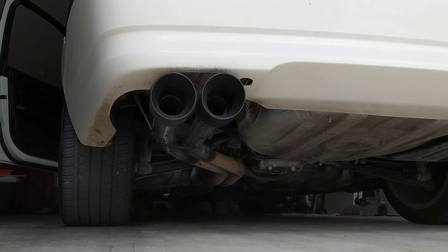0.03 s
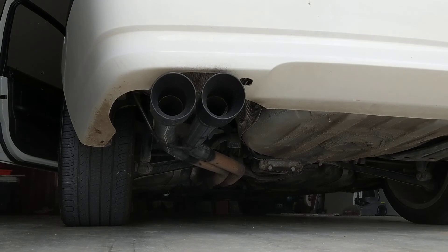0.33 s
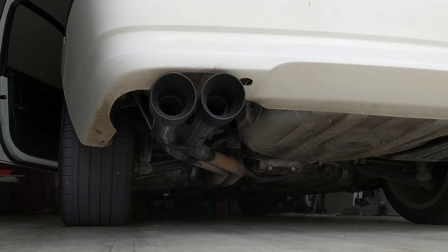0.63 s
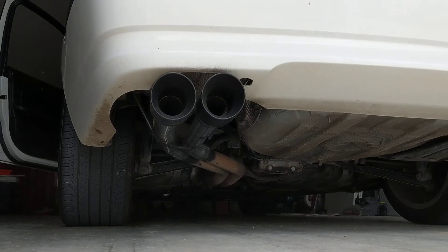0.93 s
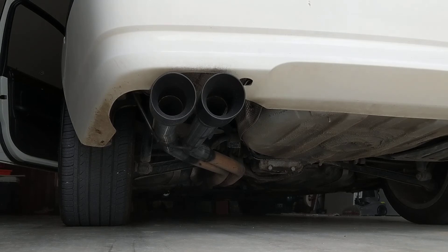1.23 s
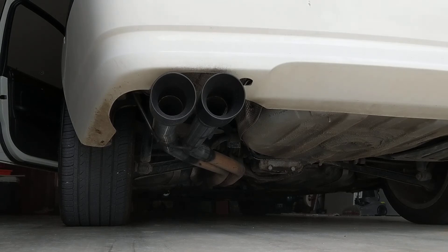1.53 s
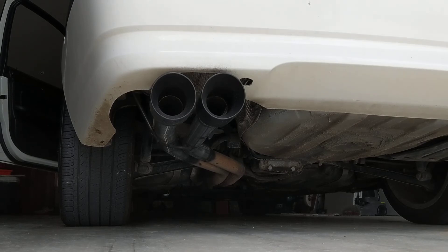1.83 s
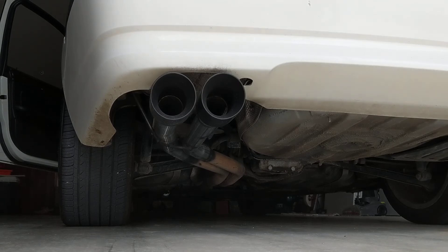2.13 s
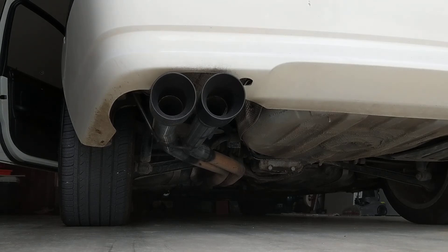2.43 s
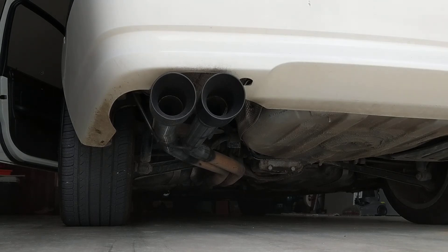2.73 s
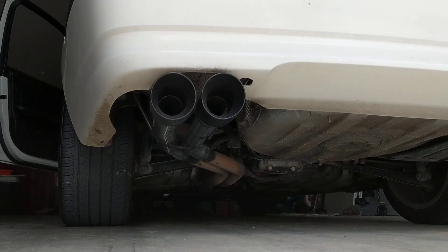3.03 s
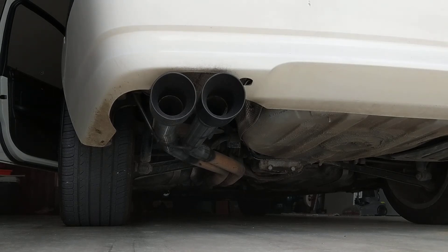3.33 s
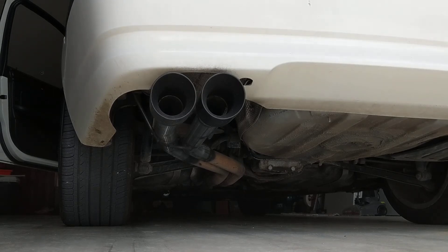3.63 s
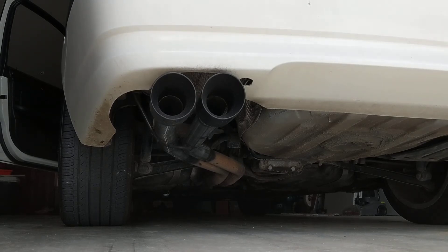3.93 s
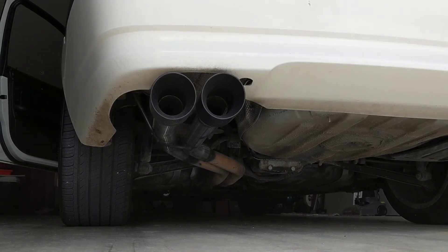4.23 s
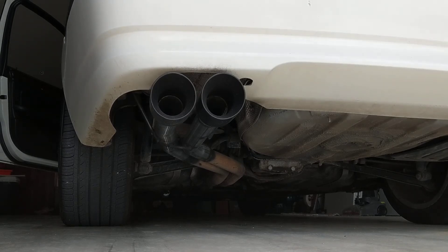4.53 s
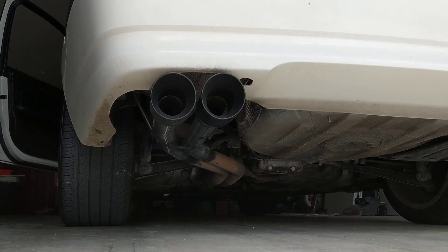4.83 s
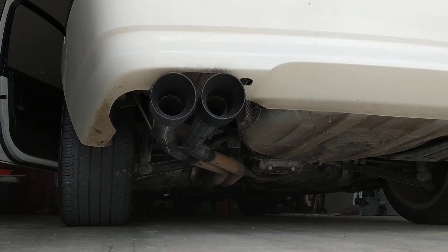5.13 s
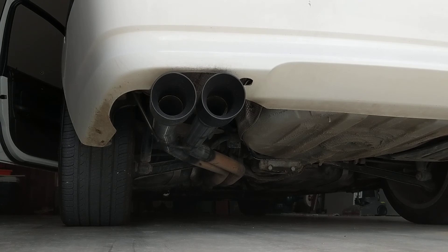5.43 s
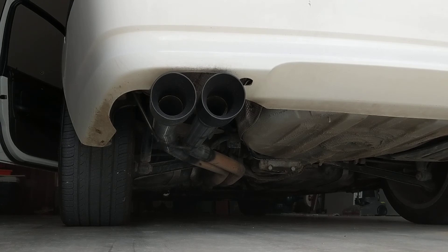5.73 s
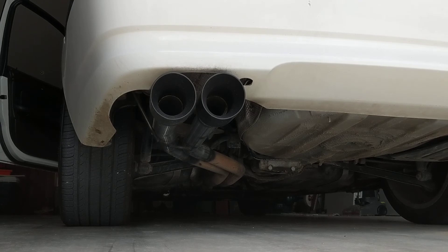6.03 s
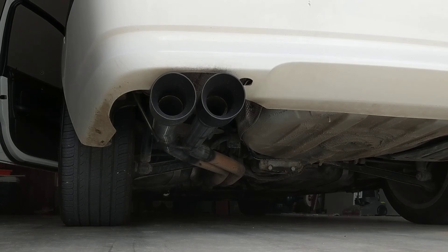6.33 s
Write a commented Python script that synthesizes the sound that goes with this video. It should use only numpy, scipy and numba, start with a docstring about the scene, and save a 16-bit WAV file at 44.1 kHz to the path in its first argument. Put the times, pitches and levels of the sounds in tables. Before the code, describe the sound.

A car engine is revved, sinks to a low idle, then climbs in three throaty blips, heard close to the exhaust.

```python
"""A six-cylinder car, parked on concrete, is revved, sinks towards idle and is blipped three more times.
Blowdown pulses from two banks ring the exhaust pipe; on throttle the tailpipes boom and rush with gas,
and on overrun the silencer burbles and drones. The microphone is so close that it overloads into a rasp,
and an automatic gain control leans on the peaks. Volleys of sharp clicks keep step with the firings."""
import sys
import numpy as np
from scipy import signal
from scipy.fft import rfft, irfft
from scipy.io import wavfile
from scipy.ndimage import uniform_filter1d
from numba import njit

SR = 44100
rng = np.random.default_rng(int(sys.argv[2]) if len(sys.argv) > 2 else 0)


def inscribe(sig):
    """Save sig as 16-bit PCM at rate SR to the path in sys.argv[1].

    A 1-D sig is mono; a 2-D sig holds one channel per row.
    Samples are clipped to [-1, 1] before scaling.
    """
    pcm = np.round(np.clip(np.atleast_2d(sig).T, -1, 1) * 32767)
    wavfile.write(sys.argv[1], SR, pcm.astype(np.int16))


N = 285768
TIME = np.arange(N) / SR

# colour of the turbulent jet at the tailpipes, shared by the clicks: frequency_hz, relative_db
JET_SPECTRUM = [(30, -25), (100, -8.5), (250, -6.5), (600, 2.5), (1100, 0), (2200, -7.5), (4000, -17.5),
                (8000, -32.5), (15000, -52)]


def undb(db):
    """Decibels to gain."""
    return 10 ** (np.asarray(db) / 20)


def curves(table, at):
    """A table's later columns, interpolated at these values of its first."""
    points, *columns = np.transpose(table)
    return [np.interp(at, points, column) for column in columns]


def smooth(x, seconds):
    """Triangular running mean."""
    size = max(int(seconds * SR), 1)
    return uniform_filter1d(uniform_filter1d(x, size), size)


def steady(x):
    """Holds the running rms at 1, leaving the single beats as they are."""
    return x / np.sqrt(smooth(x ** 2, seconds=.06) + 1e-12)


def noise(spectrum):
    """Noise of rms 1, coloured by (frequency_hz, relative_db) points."""
    hz, db = np.transpose(spectrum)
    bins_hz = np.maximum(np.arange(N // 2 + 1) * SR / N, 1)
    colour = undb(np.interp(np.log(bins_hz), np.log(hz), db))
    x = irfft(rfft(rng.standard_normal(N)) * colour, N)
    return x / x.std()


def resonate(x, hz, width_hz):
    """One resonance with gain 1 at its centre."""
    return signal.lfilter(*signal.iirpeak(hz, hz / width_hz, fs=SR), x)


def rolloff(x, hz, kind="low", order=2):
    """Smooth low-pass or high-pass."""
    return signal.sosfilt(signal.butter(order, hz, kind, fs=SR, output="sos"), x)


def partial(cycles, lag=.2):
    """A sine of rms 1 that follows a cycle count, late by a share of a cycle."""
    return np.sqrt(2) * np.sin(2 * np.pi * (cycles - lag))


def notch(x, cycles):
    """Takes out the partial that follows this cycle count."""
    carrier = np.exp(2j * np.pi * cycles)
    return x - 2 * (smooth(x / carrier, seconds=.05) * carrier).real


def throttle():
    """Engine load: each push opens the throttle steadily and holds it, then the load dies away."""
    # pushes on the accelerator: start_s, length_s, depth (about 0-1), rise_s, release_s
    pushes = [(-0.05, 0.22, 0.49, 0.037, 0.15), (0.113, 0.12, 0.97, 0.057, 0.16),
              (3.028, 0.36, 0.9, 0.34, 0.22), (3.483, 0.16, 1.09, 0.045, 0.16),
              (4.018, 0.23, 0.77, 0.042, 0.12), (4.525, 0.073, 0.61, 0.046, 0.056),
              (5.346, 0.1, 0.74, 0.068, 0.33), (5.51, 0.33, 0.89, 0.22, 0.2),
              (6.412, 0.077, 0.49, 0.041, 0.27)]
    load = np.zeros(N)
    for start_s, length_s, depth, rise_s, release_s in pushes:
        opening = np.clip((TIME - start_s) / rise_s, 0, 1)
        closing = np.exp(-np.maximum(TIME - start_s - length_s, 0) / release_s)
        load = np.maximum(load, depth * opening * closing)
    return load


def blowdown(firings, decay_share, scatter_db):
    """Each exhaust valve opens quickly and its pressure dies within a share of the firing interval."""
    index, phase = firings.astype(int), firings % 1
    strength = undb(scatter_db * rng.standard_normal(N // 100))
    return strength[index] * phase / decay_share * np.exp(-phase / decay_share)


def boom(firings, firing_hz, load, push_db):
    """The gas column pumps once per firing, swelling as it crosses the pipe's standing waves."""
    # boom with the throttle shut: firing_hz, level_db
    boom_levels = [(48, -41), (62, -34), (76, -18.5), (100, -20.5), (123, -6.5), (143, -17), (162, -7.5),
                   (177, -4.5), (205, -8), (240, -8), (320, -10.5)]
    shut_db, = curves(boom_levels, firing_hz)
    # under load the wave steepens and barks at the octave, which the silencer swallows at high speed
    bark_gain = undb(-6.5) * np.sqrt(load) * np.interp(firing_hz, [162, 185], [1, 0])
    bark = bark_gain * partial(2 * firings, lag=0.795)
    return undb(shut_db + push_db * load) * (partial(firings) + bark)


def lope(firings, firing_hz, load, push_db):
    """One bank pushes harder than the other: a throb at half the firing rate."""
    # lope with the throttle shut: firing_hz, level_db
    lope_levels = [(70, -64), (110, -40), (138, -13.5), (165, -16), (195, -34), (228, -8.5), (242, -20),
                   (275, -5), (320, -26.5)]
    shut_db, = curves(lope_levels, firing_hz)
    return undb(shut_db + push_db * load) * partial(firings / 2)


def burble(firings, ragged, hz, width_hz):
    """Ragged burns churn in the silencer: a hollow, fluttering roar."""
    churn = rng.standard_normal(N) * (blowdown(firings, decay_share=0.28, scatter_db=0.5) + 0.029)
    hollow = resonate(resonate(churn, hz, width_hz), hz, width_hz)
    return ragged ** 1.02 * steady(hollow)


def growl(firings, ragged):
    """Pulses of two unequal banks ring the pipe; their limp adds half orders between the harmonics."""
    # strength of each cylinder in firing order: relative_db
    cylinder_db = [-0.18, -0.9, -0.051, 0.84, 0.25, 0.095]
    # standing waves of pipe and silencer: pitch_hz, width_hz, relative_db
    pipe_modes = [(74.5, 3.3, -1), (125.1, 9.2, 6), (178.6, 14.8, 11.5), (250, 54, -1.5), (297, 59, 5),
                  (404, 40, 4.5), (484.4, 16.5, 3.5), (593.3, 16.5, 3), (790, 390, -3), (1065, 290, -26)]
    late_share = 0.048  # of a firing interval: the second bank's pulses come late
    path_lag_s, path_db = 0.00056, -3.5  # its path is also longer and lossier
    index = firings.astype(int)
    bank = index % 2
    # ragged burns stray in timing and strength, and are more abrupt
    timing_jitter, strength_jitter = rng.standard_normal((N // 100, 2))[index].T
    centre = .5 + late_share * (bank - .5) + 0.051 * ragged * timing_jitter
    strength = undb(np.take(cylinder_db, index, mode="wrap") + 1.26 * ragged * strength_jitter)
    spread = 0.078 * (1 - 0.67 * ragged)
    pulses = strength * np.exp(-.5 * ((firings % 1 - centre) / spread) ** 2)
    second_bank = undb(path_db) * np.interp(TIME - path_lag_s, TIME, pulses * bank)
    flow = pulses * (1 - bank) + second_bank
    flow *= 1 + 0.078 * rng.standard_normal(N)  # never quite smooth
    pipe = sum(undb(db) * resonate(flow, hz, width_hz) for hz, width_hz, db in pipe_modes)
    pipe = rolloff(pipe, hz=1490)  # the silencer's packing soaks up the treble
    pipe = rolloff(pipe, hz=75, kind="high", order=4)  # small outlets radiate almost no sub-bass
    return steady(notch(notch(pipe, firings), firings / 2))  # boom and lope carry these two orders


def gas(firings, level_db):
    """The jet rushes in uneven puffs, one per firing; a slow jet is dull, a fast one bright."""
    puffs = steady(blowdown(firings, decay_share=0.19, scatter_db=-1.0))
    jet = steady(noise(JET_SPECTRUM) * (puffs + 0.53))
    dull = rolloff(jet, hz=2000)
    brightness = np.interp(level_db, [-32, -10], [0, 1])
    return undb(level_db) * (dull + brightness * (jet - dull))


def hiss(firing_hz, load, push_db):
    """A smooth hiss, faint near idle, that grows with speed and as soon as the throttle cracks open."""
    # colour of the hiss: frequency_hz, relative_db
    hiss_spectrum = [(40, -27), (200, 15), (700, 8), (1500, -4.5), (2700, -6), (3300, -11.5), (5000, -11.5),
                     (6500, -9.5), (7700, -12), (8400, -23), (12000, -28), (15500, -37)]
    shut_db = np.interp(firing_hz, [68, 130, 300], [-33.5, -22, -15])
    return undb(shut_db + push_db * np.sqrt(load)) * noise(hiss_spectrum)


def drone(firings, firing_hz, centre_hz, width_hz, scatter_db):
    """Low orders swell as they slide through the silencer's hollow resonance; uneven burns shake them."""
    # orders the silencer sings with on overrun: multiple of the firing rate, relative_db
    orders = [(2, 1), (2.5, 1.5), (3, -8)]
    tone = np.zeros(N)
    for order, db in orders:
        detuning = 2 * (order * firing_hz - centre_hz) / width_hz
        tone += undb(db) * partial(order * firings, lag=0.86) / (1 + detuning ** 2)
    burns = undb(scatter_db * rng.standard_normal(N // 100))[firings.astype(int)]
    return tone * smooth(burns, seconds=0.0026)


def clicks(firings, decay_s, gain_db):
    """Volleys of short, sharp clicks and cracks in step with the firings."""
    # volleys of clicks: start_s, count, stride (firings from click to click), relative_db
    volleys = [(0.995, 5, 2, -10), (1.11, 5, 2, -12), (1.345, 2, 6, -20), (3.17, 4, 1, -23),
               (3.25, 5, 1, -8), (3.364, 6, 2, -1), (6.441, 1, 1, -2)]
    kicks = np.zeros(N)
    for start_s, count, stride, db in volleys:
        click_firings = np.interp(start_s, TIME, firings) + stride * np.arange(count)
        kicks[np.searchsorted(firings, click_firings)] = undb(db + gain_db)
    envelope = signal.lfilter([1], [1, -np.exp(-1 / (decay_s * SR))], kicks + 1e-18)
    return rolloff(envelope * noise(JET_SPECTRUM), hz=3200)


def lulls():
    """The exhaust note dips briefly between coasting and pulling; the result is in dB."""
    # dips of the note: centre_s, half_length_s, depth_db
    dips = [(1.765, 0.041, 6.5), (3.03, 0.037, 11), (3.973, 0.045, 6.5), (4.493, 0.068, 5.5),
            (5.299, 0.055, 6), (6.36, 0.088, 9)]
    return -sum(db * np.exp(-((TIME - centre_s) / half_s) ** 2) for centre_s, half_s, db in dips)


def scene():
    """The exhaust follows the crankshaft; speed, throttle and overrun set the mix."""
    # engine speed in five stretches (first rev, sag to idle, three blips): time_s, firing_hz
    revs = [
        [(0.0, 107.4), (0.198, 153.1), (0.306, 159.6), (0.402, 160.5), (0.458, 161.1), (0.95, 124.3),
         (1.396, 90.7), (1.504, 82.33), (1.7, 72.7)],
        [(1.7, 72.4), (1.898, 64.55), (2.24, 59), (2.444, 55.5), (2.88, 49.16), (3.05, 48.44), (3.148, 52.2),
         (3.22, 57)],
        [(3.22, 58.53), (3.388, 99.53), (3.442, 114.7), (3.498, 132.2), (3.548, 146.4), (3.706, 168.4),
         (3.796, 173.9), (3.912, 175.4), (4.0, 173.9)],
        [(4.0, 173.2), (4.108, 196.7), (4.206, 226), (4.304, 240.3), (4.506, 241.2), (4.684, 218.3),
         (4.83, 205.3), (5.228, 166.1), (5.35, 163)],
        [(5.35, 166.1), (5.396, 171), (5.578, 229.4), (5.68, 266), (5.85, 313.7), (6.048, 316.7),
         (6.184, 322.6), (6.294, 305.8), (6.48, 299.5)],
    ]
    # the exhaust with the throttle shut: firing_hz, growl_db, gas_db
    coasting_levels = [(48.39, -14.5, -39.5), (55, -17.5, -43), (63, -15, -38.5), (70.7, -14, -36.5),
                       (90, -8, -30), (118, -6.5, -21), (150, -7.5, -18.5), (171, -7.5, -21.5),
                       (205, -4, -15), (271.8, -3.5, -14.5), (324, -9, -13.5)]
    growl_push_db, gas_push_db, growl_overrun_db = 11.5, 21.5, -1.5  # added at full load or overrun
    firing_hz, = curves(np.concatenate(revs), TIME)
    firings = np.cumsum(firing_hz) / SR
    load, lull_db = throttle(), lulls()
    sink_hz_per_s = -smooth(np.gradient(firing_hz) * SR, seconds=0.048)
    overrun = np.interp(sink_hz_per_s, [30, 62], [0, 1])  # the engine is running down quickly
    ragged = np.clip(0.26 + 0.46 * overrun + 0.17 * load, 0, 1)  # unevenness of the burns

    shut_growl_db, shut_gas_db = curves(coasting_levels, firing_hz)
    growl_db = shut_growl_db + growl_push_db * load + growl_overrun_db * overrun + lull_db
    gas_db = shut_gas_db + gas_push_db * load + 0.18 * lull_db
    low_end = boom(firings, firing_hz, load, push_db=16.5) + lope(firings, firing_hz, load, push_db=12)
    # the silencer roars and drones once enough gas flows through it; at idle it rings faintly
    flow = undb(np.interp(firing_hz, [55, 140], [-15, 0]))
    roar = undb(-0.5) * flow * burble(firings, ragged, hz=386, width_hz=300)
    hollow = drone(firings, firing_hz, centre_hz=388, width_hz=178, scatter_db=4.0)
    hollow *= undb(-10 + lull_db) * flow * overrun
    ring = undb(-33) * burble(firings, ragged=0.69, hz=391, width_hz=82)
    pipe = undb(growl_db) * (growl(firings, ragged) + roar)
    rush = gas(firings, gas_db)
    crackle = clicks(firings, decay_s=0.00087, gain_db=4.0)
    air = hiss(firing_hz, load, push_db=6.5)
    fade_in = np.minimum(TIME / .004, 1)
    return (fade_in * (undb(lull_db) * low_end + pipe + hollow + ring + rush + crackle + air))[None]


@njit
def follow(x, attack, release, start):
    """Level follower that rises and falls at its own pace."""
    out, level = np.empty(len(x)), start
    for i in range(len(x)):
        level += (x[i] - level) * (attack if x[i] > level else release)
        out[i] = level
    return out


def gain_control(x, threshold_db, attack_s, release_s):
    """Turns the sound down when its rms passes the threshold, then lets it recover."""
    threshold = float(undb(threshold_db))
    rms = np.sqrt(np.abs(smooth(x ** 2, seconds=.01)))
    level = follow(rms, 1 / (attack_s * SR), 1 / (release_s * SR), threshold)
    return x * np.minimum(threshold / level, 1)


def record(dry):
    """The overloaded microphone flattens the peaks, gain control follows, and the top is cut."""
    ceiling, knee_hardness, top_hz = 0.81, 24.0, 15750
    clipped = dry[0] / (1 + np.abs(dry[0] / ceiling) ** knee_hardness) ** (1 / knee_hardness)
    centred = rolloff(clipped, hz=8, kind="high", order=1)
    held = gain_control(centred, threshold_db=-8.0, attack_s=0.021, release_s=0.8)
    top_cut = signal.ellip(12, .2, 80, top_hz, fs=SR, output="sos")
    return signal.sosfilt(top_cut, held)[None]


dry = scene()
out = record(dry)
inscribe(out)
```